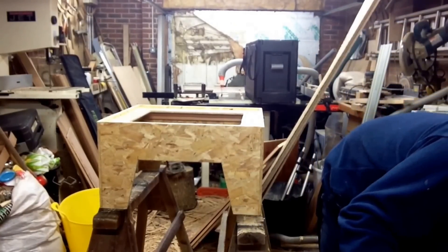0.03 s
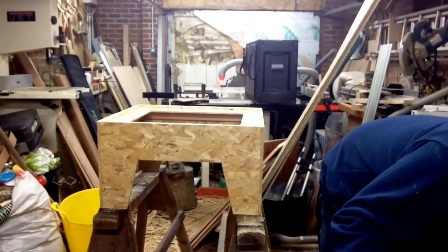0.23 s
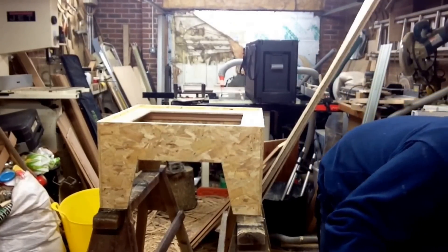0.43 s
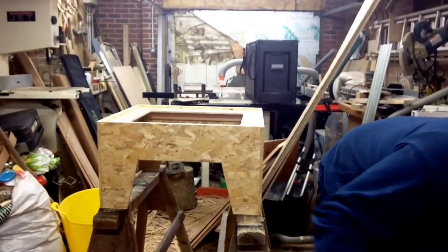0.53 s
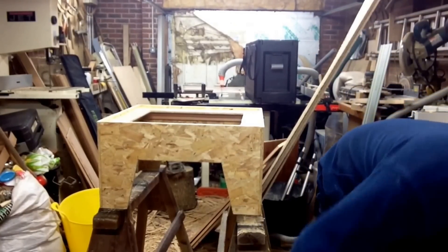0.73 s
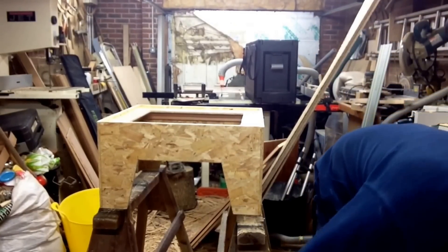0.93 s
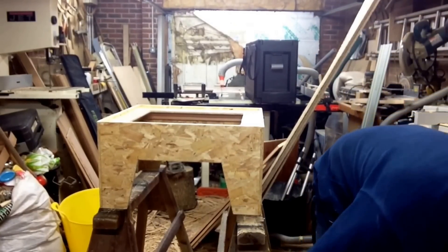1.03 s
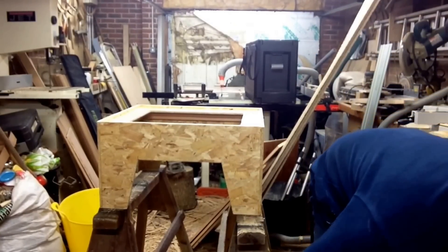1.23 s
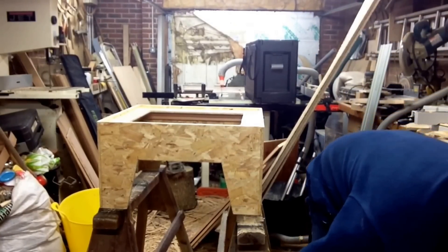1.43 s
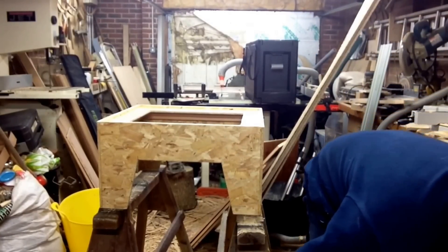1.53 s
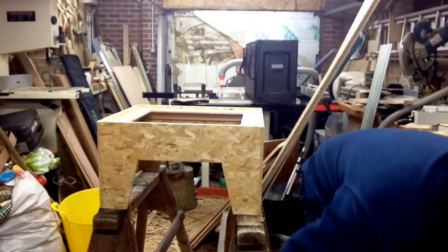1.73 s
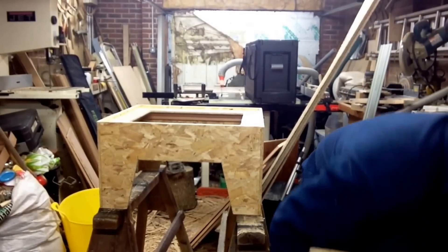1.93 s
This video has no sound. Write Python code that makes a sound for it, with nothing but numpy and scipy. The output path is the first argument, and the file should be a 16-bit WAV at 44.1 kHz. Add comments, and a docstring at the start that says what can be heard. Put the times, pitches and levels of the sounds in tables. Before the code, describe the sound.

Board offcuts are handled: slight bumps, a single strong woody clunk early on, then much quieter knocks and grainy rubbing, with a short bright scrape late. Small cluttered room, short reverberation, small mono microphone, low background hiss.

```python
"""Board offcuts in a workshop

One board drops with a hollow knock while others bump lightly, scrape along each other and brush
through shavings. Knocks are fading sine tones with short bursts of noise and a brief room answer;
rubbing is grainy noise that rises and falls. A small microphone cuts the bass and a steady hush lies below.
"""
import sys
import numpy as np
from scipy import signal
from scipy.fft import rfft, irfft, next_fast_len
from scipy.io import wavfile
from scipy.ndimage import uniform_filter1d

SR = 44100
rng = np.random.default_rng(int(sys.argv[2]) if len(sys.argv) > 2 else 0)


def dump(signal):
    """Clip the signal to [-1, 1] and save it as 16-bit WAV at the path in sys.argv[1]."""
    limited = np.clip(np.atleast_2d(signal).T, -1, 1)
    pcm = np.round(limited * 32767).astype(np.int16)
    wavfile.write(sys.argv[1], SR, pcm)


N = 88200  # two seconds of samples

# Steady hush of room and microphone. Each row: frequency in Hz, relative level in dB per Hz.
HUSH_COLOUR = [(18, -64.5), (30, -28), (69, -20), (120, -11), (225, 1.5), (369, -8.5), (467, 3),
               (656, -19.5), (12900, -23), (15500, -29)]
# How fast the room's answer fades. Each row: frequency in Hz, time to fall by 60 dB in seconds.
ROOM_FADE = [(130, 0.18), (280, 0.24), (800, 0.19), (8000, 0.074)]
# Brushing and scraping loudness. Each row: time in seconds, brushing level in dB, scraping level in dB.
RUB_LEVELS = [(0.0, -62, -55), (0.03, -67, -63), (0.05, -64.5, -49.5), (0.08, -67.5, -63.5),
              (0.15, -59, -52), (0.23, -64, -58), (0.25, -61.5, -45.5), (0.27, -62, -58),
              (0.32, -57.5, -54.5), (0.33, -56, -51.5), (0.38, -63, -58.5), (0.53, -57, -57.5),
              (0.65, -69.5, -67.5), (0.85, -68.5, -72), (0.9, -65, -58.5), (0.94, -69, -68),
              (0.97, -66.5, -61), (1.184, -68.5, -67.5), (1.19, -76, -57.5), (1.22, -52.5, -55),
              (1.25, -52, -49.5), (1.29, -65.5, -66), (1.334, -67.5, -66), (1.338, -62.5, -55.5),
              (1.43, -69, -70.5), (1.6, -64, -55.5), (1.71, -63, -56.5), (1.75, -61.5, -48.5),
              (1.78, -60, -55.5), (1.845, -55.5, -51.5), (1.848, -41.5, -42), (1.91, -47.5, -48),
              (1.94, -57, -54), (2.0, -58, -58.5)]
# Boards rumbling as they slide. Each row: time in seconds, level in dB.
DRAG_LEVELS = [(0.0, -54.5), (0.28, -62.5), (0.32, -63), (0.46, -78.5), (0.59, -70), (0.81, -64.5),
               (1.11, -67.5), (1.34, -69), (1.59, -72), (1.83, -55), (2.0, -56)]
# Kind of scraping. Each row: time in seconds, edge scraping's share of the scraping power (0-1).
EDGE_SHARE = [(0, 0.05), (.6, 0.21), (1.45, 0.12), (1.65, 0.51), (2, 0.43)]
# Colour of brushing. Each row: frequency in Hz, relative level in dB per Hz.
BRUSH_COLOUR = [(1760, -17.5), (3000, 1.5), (8120, 7.5), (8760, 6), (9920, 6.5), (15500, 3)]
# Colour of board face on board face. Each row: frequency in Hz, relative level in dB per Hz.
FACE_COLOUR = [(410, -5.5), (700, -4.5), (1290, -5), (1700, -6), (6000, -16.5), (7800, -55), (13200, -120)]
# Colour of board edge on board face. Each row: frequency in Hz, relative level in dB per Hz.
EDGE_COLOUR = [(530, -38.5), (900, -13), (1930, -0.5), (2610, -0.5), (7000, -15), (9100, -54.5),
               (15400, -120)]
# Basic ringing tones of a board, adapted for each contact.
# Each row: frequency in Hz, relative level in dB, time to fall by 60 dB in seconds.
BOARD_MODES = [(136.1, -1.5, .14), (150.2, 3.5, 0.074), (203, -13, 0.1), (236.4, 1.5, 0.11),
               (330.4, -3, 0.05), (401.4, -9, 0.12), (450.9, 5.5, 0.046), (557, 2.5, 0.039),
               (608.7, 1.5, 0.052), (730, -5.5, 0.048), (850, -4.5, 0.055), (930, -11.5, 0.096),
               (1055, -10, 0.15), (1223, -8.5, 0.19), (1500, -18.5, 0.07)]
# Contacts between boards. Each row: start in seconds, peak of the tone in dB (before the microphone),
# favoured pitch in Hz, reach around it in octaves, rise time in seconds, ringing time as a factor,
# woody crack in dB and bright tick in dB, both relative to the tone's peak.
CONTACTS = [(.018, -46, 248, 0.2, 0.0041, 0.88, -8, -27.5),
            (.031, -40.5, 600, 0.14, 0.00077, 1.1, -28, -29),
            (0.044, -40.5, 257, 0.59, 0.0028, 0.89, -18, -18.5),
            (0.074, -47, 163, 0.12, 0.005, 1.6, -32.5, -30), (0.202, -47, 475, 0.4, 0.0012, 9, 3.5, -38.5),
            (0.2425, -14, 238.8, 0.77, 0.0015, 1.1, -11.5, -35),
            (.2478, -6, 456, 0.55, 0.0019, 0.75, -24, -63),
            (.2595, -12, 623.7, 0.39, 0.0027, 0.35, -42, -42.5),
            (0.2829, -24, 222, 0.25, 0.00097, 0.44, -23, -48.5),
            (.3, -33, 610, 0.069, 0.0037, 0.88, -24.5, -40.5),
            (0.335, -38, 333.2, 0.23, 0.0021, 1.4, -8.5, -12),
            (0.405, -38, 135, 1.36, 0.001, 1.77, -10, -18), (0.741, -57, 473, 1.15, 0.0011, 1.3, -8, -2),
            (0.858, -48.5, 170, 0.51, 0.0037, 1.1, -12, -19),
            (0.885, -36.5, 224.5, 0.37, 0.0094, 0.49, -23.5, -24),
            (0.913, -46, 255, 0.33, 0.0016, 0.51, -37, -31), (0.961, -51, 241, 0.74, 0.0041, 1.2, -3, -13),
            (.995, -52, 512, 0.29, 0.005, 1.3, -28, -15), (1.045, -46.5, 223, 0.29, 0.0022, 0.98, -30, -28),
            (1.103, -50, 259, 0.53, 0.0015, 0.62, -6, -15), (1.14, -53, 425, 0.33, 0.0019, 0.93, -16, -22),
            (1.187, -44.5, 510, 0.98, 0.0023, 1.6, -12, -11.5),
            (1.206, -41.5, 465, 0.8, 0.00079, 1.9, -6.5, -9),
            (1.264, -45, 282.7, 0.77, 0.00064, 1.05, -6, -15),
            (1.337, -48.5, 265, 0.77, 0.0086, 1.3, -6, -10),
            (1.369, -49.5, 249, 0.24, 0.0013, 0.53, -5, -12),
            (1.486, -57, 446, 0.54, 0.0017, 0.47, 1.5, -2),
            (1.496, -40.5, 389, 0.45, 0.0022, 0.52, -12, -28),
            (1.53, -50, 149.6, 0.074, 0.0039, 3, -5, -25), (1.604, -45, 299, 0.6, 0.0029, 0.68, -4.5, -12),
            (1.631, -45, 251, 0.18, 0.0027, 0.45, -20, -18),
            (1.742, -45, 392.5, 1.8, 0.0072, 1.3, -4.5, -11),
            (1.754, -39, 148, 0.08, 0.016, 2.25, -15, -27),
            (1.847, -37, 255, 0.23, 0.0028, 0.84, -7.5, -1.5),
            (1.907, -35, 385, 0.67, 0.0031, 0.62, -6.5, -25), (1.928, -40, 223, 0.57, 0.003, 0.33, -6, -31),
            (1.979, -57.5, 368, 0.18, 0.00087, 1, -17, -30)]
# Colour of the woody crack. Each row: frequency in Hz, relative level in dB per Hz.
CRACK_COLOUR = [(250, 22), (600, 18.5), (900, 12.5), (1500, 8.5), (2500, -2), (5000, -20.5), (15000, -34.5)]
# Colour of the bright tick. Each row: frequency in Hz, relative level in dB per Hz.
TICK_COLOUR = [(1000, -2.5), (3000, 4), (8000, 13.5), (15000, -1.5)]

HUSH_DB, ROOM_DB = -66, -14.5  # hush before the microphone's top limit; room answer relative to the knocks
LOW_CUT_HZ, TOP_HZ = 125.3, 15550
GRAIN_SPREAD_DB = 2.5  # average extra level of a grain
PATCH_DB = 3.5  # typical rise and dip of the scraping's patches
SCATTER_DB = 1.2  # random level change of each tone
CRACK_T60_S, TICK_T60_S, CRACK_RISE_S = 0.12, 0.023, 0.00046


def amp(db):
    """Turn decibels into a plain multiplier."""
    return 10 ** (np.asarray(db) / 20)


def unit(x):
    """Scale a signal to an rms (average strength) of 1."""
    return x / np.sqrt(np.mean(x ** 2) + 1e-20)


def along(points, hz):
    """Read a value between (Hz, value) points on a log frequency axis."""
    point_hz, value = np.transpose(points)
    return np.interp(np.log(hz + 1), np.log(point_hz + 1), value)


def curves(rows):
    """Give one value per sample for each column after the time."""
    seconds, *columns = np.transpose(rows)
    return [np.interp(np.arange(N) / SR, seconds, column) for column in columns]


def filtered(x, response):
    """Multiply the spectrum of x by a response that depends on frequency."""
    size = next_fast_len(N + SR // 2)  # spare room for the filter's tail
    hz = np.fft.rfftfreq(size, 1 / SR)
    return irfft(rfft(x, size) * response(hz), size)[..., :N]


def shaped(points):
    """Make a filter response from (Hz, dB) points."""
    return lambda hz: amp(along(points, hz))


def gritty(response, grains_per_s, grain_share):
    """Mix smooth noise with randomly timed single-sample grains, colour it and bring it to rms 1."""
    happens = rng.random(N) < grains_per_s / SR
    strength = amp(GRAIN_SPREAD_DB * rng.exponential(size=N))
    grains = happens * strength * rng.standard_normal(N)
    mix = rng.standard_normal(N) + grain_share * unit(grains)
    return unit(filtered(mix, response))


def steady_hush():
    """Room and microphone hush: noise of fixed colour and level."""
    return amp(HUSH_DB) * unit(filtered(rng.standard_normal(N), shaped(HUSH_COLOUR)))


def room_answer(x):
    """Each frequency of the room's answer fades at its own speed; every 0.2 s of sound gets a new tail."""
    out, size = np.zeros(N + SR), SR // 5
    delay = 250  # samples
    for start in range(0, N, size):
        hz, t, noise = signal.stft(rng.standard_normal(SR // 2), SR, nperseg=256)
        fade = amp(-60 * t / along(ROOM_FADE, hz)[:, None])
        tail = signal.istft(noise * fade, SR, nperseg=256)[1]
        wet = signal.fftconvolve(x[start:start + size], tail / np.linalg.norm(tail))
        out[start + delay:][:len(wet)] += wet
    return out[:N]


def brushing(level_db):
    """Boards brush through shavings: bright noise with fine grains."""
    return amp(level_db) * gritty(shaped(BRUSH_COLOUR), 1500, 0.073)


def board_response(hz):
    """Sum the board's resonances, broader than in free ringing, with alternating signs."""
    total = 0
    for k, (centre_hz, db, t60) in enumerate(BOARD_MODES):
        width_hz = 5 / t60
        band = 1j * hz * width_hz
        total = total + (-1) ** k * amp(db) * band / (centre_hz * centre_hz - hz * hz + band)
    return total


def dragging():
    """Sliding stirs the boards' own resonances, heard as a grainy rumble."""
    level_db, = curves(DRAG_LEVELS)
    return amp(level_db) * gritty(board_response, 90, 1.0)


def patchy(x):
    """Passing resonances: random gain patches some 250 Hz wide and 40 ms long."""
    z = signal.stft(x, nperseg=512)[2]
    field = uniform_filter1d(rng.standard_normal(z.shape), size=3, axis=0)  # smooth over frequency
    field = uniform_filter1d(field, size=7, axis=1)  # smooth over time
    return unit(signal.istft(z * amp(PATCH_DB * unit(field)), nperseg=512)[1][:N])


def scraping(level_db):
    """Boards rub face on face or edge on face: two grainy noises whose balance shifts."""
    edge = np.clip(curves(EDGE_SHARE)[0], 0, 1)
    face_sound = np.sqrt(1 - edge) * gritty(shaped(FACE_COLOUR), 660, 0.41)
    edge_sound = np.sqrt(edge) * gritty(shaped(EDGE_COLOUR), 300, 0.49)
    return amp(level_db) * patchy(face_sound + edge_sound)


def rubbing():
    """Add brushing, scraping and the rumble of sliding boards."""
    brush_db, scrape_db = curves(RUB_LEVELS)
    return brushing(brush_db) + scraping(scrape_db) + dragging()


def board_tone(pitch_hz, reach, rise, ring, luck):
    """Offcuts differ in size: stretch all modes so the nearest lands on the pitch, then ring them."""
    t = np.arange(SR // 4) / SR
    modes, level, t60 = np.transpose(BOARD_MODES)
    nearest = np.abs(np.log(modes / pitch_hz)).argmin()
    hz = modes * pitch_hz / modes[nearest]
    octaves_away = np.log2(hz / pitch_hz)
    strength = amp(level + luck) * np.exp(-.5 * (octaves_away / reach) ** 2)
    sines = np.sin(2 * np.pi * hz[:, None] * t)
    fades = np.exp(-np.log(1000) * t / (ring * t60[:, None]))
    swell = (1 - np.exp(-t / rise)) ** 2
    tone = swell * (strength @ (fades * sines))
    return tone / np.abs(tone).max()


def knocks():
    """Each contact rings a board and adds a woody crack and a bright tick, both fading noise."""
    layers = np.zeros((3, N + SR))  # tone, crack loudness, tick loudness
    t = np.arange(SR // 4) / SR
    scatter = SCATTER_DB * rng.standard_normal((len(CONTACTS), len(BOARD_MODES)))
    for contact, luck in zip(CONTACTS, scatter):
        start, db, pitch_hz, reach, rise, ring, crack_db, tick_db = contact
        tone = board_tone(pitch_hz, reach, rise, ring, luck)
        crack = (1 - np.exp(-t / CRACK_RISE_S)) * amp(crack_db - 60 * t / CRACK_T60_S)
        tick = amp(tick_db - 60 * t / TICK_T60_S)
        layers[:, round(start * SR):][:, :len(t)] += amp(db) * np.array([tone, crack, tick])
    body, crack, tick = layers[:, :N]
    crack_sound = crack * gritty(shaped(CRACK_COLOUR), 1000, 0.08)
    tick_sound = tick * gritty(shaped(TICK_COLOUR), 1600, 0.18)
    return body + crack_sound + tick_sound


def scene():
    """Add the knocks, the room's answer to them and the rubbing."""
    hits = knocks()
    mix = hits + amp(ROOM_DB) * room_answer(hits) + rubbing()
    return mix[None]  # one channel


def bass_cut(hz):
    """The microphone loses bass steeply: the same low cut applied twice."""
    u = hz / LOW_CUT_HZ
    once = -u * u / (1 + 1.1j * u - u * u)
    return once ** 2


def record(dry):
    """Cut the bass, add the hush and let nothing through above the top limit."""
    heard = filtered(dry, bass_cut) + steady_hush()
    return filtered(heard, lambda hz: hz < TOP_HZ)


dry = scene()
out = record(dry)
dump(out)
```